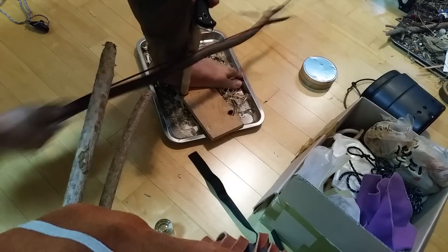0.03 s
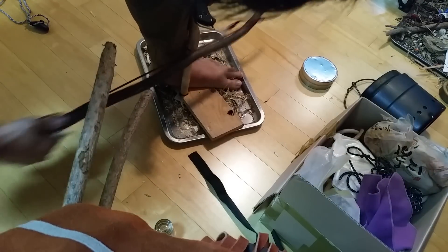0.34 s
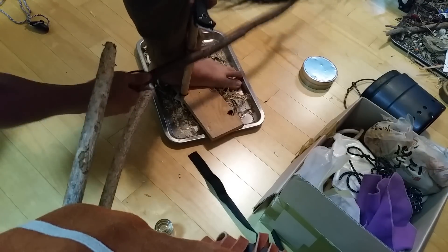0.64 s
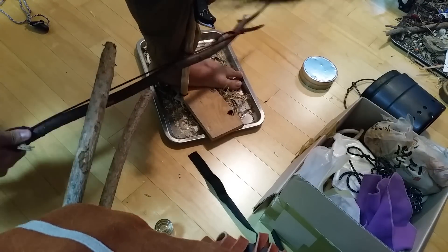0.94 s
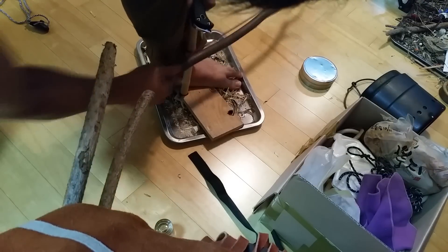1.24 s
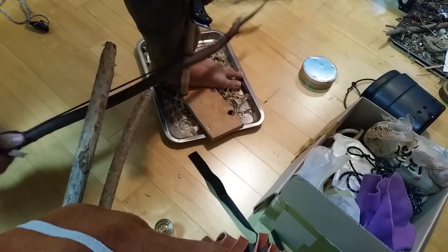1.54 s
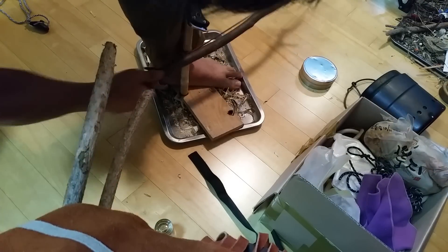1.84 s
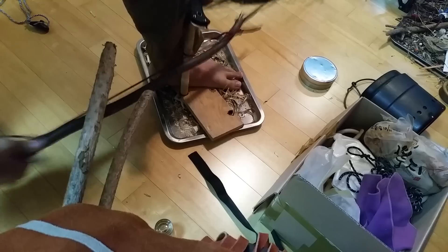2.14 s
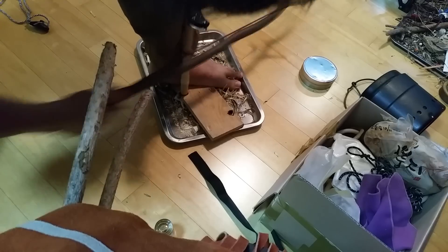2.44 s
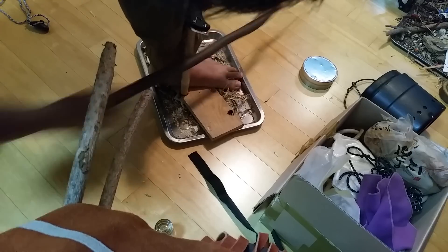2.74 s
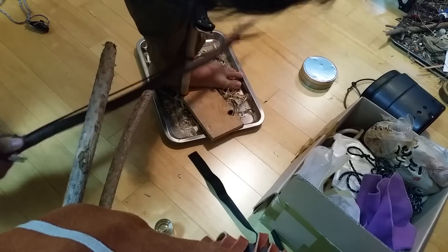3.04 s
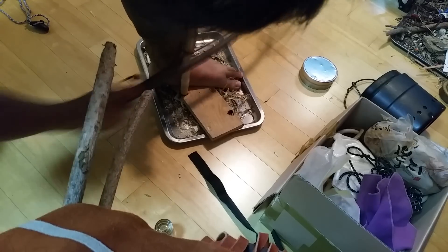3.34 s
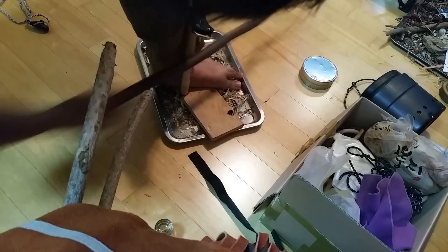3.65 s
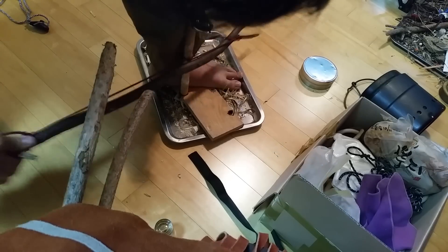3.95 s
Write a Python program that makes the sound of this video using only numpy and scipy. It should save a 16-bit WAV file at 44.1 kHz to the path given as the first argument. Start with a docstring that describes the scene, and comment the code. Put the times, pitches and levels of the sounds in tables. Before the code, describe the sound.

A wooden bow drill rubs back and forth throughout four seconds, making dry, hissing strokes, nearly four a second, growing slightly louder. The board knocks on a metal tray at about 1 second, sharply at 1.6, then often, with a bright snap at 3.6. Faint squeaks come near 1.8 and 2.9 seconds. Soft juddering groans and a low floor rumble build underneath, in a small quiet room.

```python
"""A bow drill, worked on a board in a metal tray on a wooden floor; two microphones in a small room.
Each push and pull of the bow spins the spindle, whose tip hisses in its dry socket, rings the board
and at times squeaks or judders with a low groan. The board rocks and knocks on the tray, the wood
ticks, and tray and floor rumble under the effort. Behind it all: a short room tail and still air."""
import sys
import numpy as np
from scipy import signal
from scipy.fft import rfft, irfft, next_fast_len
from scipy.io import wavfile
from scipy.ndimage import uniform_filter1d, map_coordinates

SR = 44100
rng = np.random.default_rng(int(sys.argv[2]) if len(sys.argv) > 2 else 0)


def dump(signal):
    """Clip the signal to [-1, 1] and save it as 16-bit WAV at the path in sys.argv[1]."""
    limited = np.clip(np.atleast_2d(signal).T, -1, 1)
    pcm = np.round(limited * 32767).astype(np.int16)
    wavfile.write(sys.argv[1], SR, pcm)


N = 176400

# still air of the room: freq_hz, gain_db
AIR_COLOUR = [(25, -16), (70, -6.5), (200, -7), (400, -9.5), (1500, -37), (15000, -19)]
# decay of the room: freq_hz, t60_s
ROOM_DECAY = [(200, 0.37), (1500, 0.32), (10000, 0.21)]
# the floor under the tray: freq_hz, width_hz, gain_db
FLOOR_MODES = [(143, 19.3, 1), (187.7, 12.8, 2.5), (222, 11, -1.5), (267, 13, -1.5)]
# dull thudding of tray and floor: freq_hz, gain_db
THUD_COLOUR = [(25, -34), (60, -6), (110, 7.5), (260, -0.5), (340, -5.5), (550, -6.5), (800, -15.5),
               (2000, -18.5)]
# rise and fall of the rumble: time_s, level_db
RUMBLE_LEVELS = [(0.0, -68), (0.14, -46.5), (0.46, -58), (0.59, -50.5), (0.73, -62), (0.97, -43.5),
                 (1.18, -56), (1.25, -42), (1.39, -55), (1.63, -36.5), (1.77, -53), (1.84, -44),
                 (1.97, -46), (2.18, -41), (2.27, -53.5), (2.37, -41), (2.54, -51), (2.7, -37),
                 (2.83, -49.5), (2.88, -41.5), (2.96, -49.5), (3.19, -38), (3.45, -45.5), (3.66, -32.5),
                 (3.98, -46.5), (4.0, -32.5)]
# rise and fall of the floor's lowest mode: time_s, level_db
BOOM_LEVELS = [(0.0, -67), (0.18, -62), (0.68, -67.5), (1.6, -53), (2.62, -61), (2.7, -47), (2.9, -62.5),
               (3.23, -48), (3.49, -65), (3.53, -51.5), (3.95, -47), (4.0, -54.5)]
# dry ticks of the wood: start_s, peak_db
WOOD_TICKS = [(1.9202, -24.5), (3.610, -17.5), (3.651, -29)]
# spectrum of a tick: freq_hz, gain_db
TICK_COLOUR = [(500, -16), (3000, -19), (10000, 10), (16000, -5)]
# resonances of board and tray: freq_hz, width_hz, gain_db
BOARD_MODES = [(940, 104, 1.5), (1062, 111, -2), (1402, 64, 5.5), (1730, 160, -0.5), (1846, 75, -1.5)]
# the board knocks on the tray: start_s, low_modes_db, middle_mode_db, high_modes_db, crack_db
BOARD_KNOCKS = [(.264, -45, -55, -58, -42), (1.048, -28, -24.5, -18.5, -26), (1.505, -34, -32, -46, -49),
                (1.585, -14, -22.5, -20.5, -28), (1.607, -32, -40, -37, -44), (1.659, -39, -36, -45, -34.5),
                (1.792, -35, -37, -44, -44), (1.925, -42, -49, -52, -36.5), (2.002, -39.5, -46, -50, -37),
                (2.162, -31, -32, -45, -30.5), (2.187, -28.5, -33, -44, -53),
                (2.493, -28.5, -31.5, -36, -52), (2.715, -38, -53, -55, -43), (3.026, -36, -28.5, -38, -39),
                (3.102, -29.5, -26, -31, -28.5), (3.164, -25.5, -25, -39, -34),
                (3.506, -32.5, -42, -44, -36), (3.574, -36, -28, -35, -39),
                (3.612, -20.5, -21.5, -19.5, -21), (3.654, -23.5, -35, -40, -30.5),
                (3.703, -30, -25.5, -40, -40), (3.908, -31.5, -34, -42, -36)]
# the crack of a knock: freq_hz, gain_db
CRACK_COLOUR = [(30, -35), (100, -2), (400, 12), (550, 9), (750, 4), (1800, 6), (2100, -19), (2600, 11),
                (4000, -28), (12000, -23), (16000, -27)]
# low groans of the spindle juddering in its socket: middle_s, length_s, pitch_hz, level_db
SPINDLE_JUDDERS = [(.14, 0.21, 222, -71), (.95, 0.31, 218, -47.5), (1.245, 0.11, 262.5, -41),
                   (1.85, 0.14, 267, -41.5), (2.15, 0.16, 152, -40), (2.365, 0.15, 267, -42),
                   (2.385, .12, 147, -40), (2.69, 0.045, 218, -38.5), (3.09, 0.21, 232.7, -40),
                   (3.2, 0.12, 163.2, -34.5), (3.66, 0.11, 180, -39), (3.78, 0.18, 150.9, -42),
                   (3.94, .1, 263.5, -44.5)]
# thin squeaks of the tip: middle_s, length_s, pitch_hz, level_db
TIP_SQUEAKS = [(1.82, .14, 1420, -47), (2.88, .13, 1425, -45), (1.834, .02, 7950, -38)]
# bow strokes, push and pull in turn: start_s, fastest_s, end_s, level_db
BOW_STROKES = [(-0.057, 0.195, 0.26, -35.5), (0.33, 0.542, 0.74, -37), (0.709, 0.993, 1.09, -34.5),
               (1.122, 1.26, 1.415, -33), (1.376, 1.613, 1.686, -31), (1.692, 1.812, 1.958, -33),
               (1.92, 2.126, 2.217, -32), (2.228, 2.351, 2.474, -33), (2.415, 2.649, 2.738, -35),
               (2.715, 2.867, 2.985, -35), (2.947, 3.121, 3.209, -31), (3.181, 3.32, 3.414, -33),
               (3.409, 3.554, 3.646, -31), (3.619, 3.753, 3.84, -30.5), (3.825, 3.977, 4.17, -32.0)]
# colour of the pull against the push: freq_hz, gain_db
PULL_OVER_PUSH = [(1700, 4.5), (2800, 2.5), (4500, -0.5), (7100, 2.5), (7900, 1.5), (8800, 4.5),
                  (10500, 1.5), (12300, 1.5), (15000, 2.5)]
# friction hiss at the left microphone: freq_hz, gain_db
LEFT_MIC_HISS = [(150, -24), (400, -15.5), (800, -10.5), (2000, -7.5), (2900, -7), (3600, -9), (4200, -9.5),
                 (5200, -15), (5800, -15), (7100, -17), (7700, -9), (8400, -10), (10300, 2), (11200, -3),
                 (12300, -1.5), (14000, -10.5), (15600, -9.5)]
# friction hiss at the right microphone: freq_hz, gain_db
RIGHT_MIC_HISS = [(150, -7), (400, -18), (800, -13.5), (2000, -5.5), (2850, -1), (3800, -5.5), (4250, 0.5),
                  (5200, -4.5), (5800, 0.5), (7200, -5.5), (7850, 2), (8400, -2), (9500, -7), (12500, -9),
                  (15600, -9.5)]


def amp(db):
    return 10 ** (np.asarray(db) / 20)


def unit(x):
    return x / np.sqrt(np.mean(x ** 2) + 1e-20)


def along(points, hz):
    """Read (freq_hz, value) points on a log frequency axis."""
    freqs, values = np.transpose(points)
    return np.interp(np.log(hz + 1), np.log(freqs + 1), values)


def wobble(knots_per_s):
    """A smooth random curve."""
    return map_coordinates(rng.standard_normal(N // 4), [np.arange(N) * knots_per_s / SR], mode="wrap")


def filtered(x, response):
    """x through a complex response of frequency."""
    size = x.shape[-1]
    padded = next_fast_len(size + SR // 4)
    return irfft(rfft(x, padded) * response(np.fft.rfftfreq(padded, 1 / SR)), padded)[..., :size]


def coloured(x, points):
    """x through a (freq_hz, gain_db) curve."""
    return filtered(x, lambda hz: amp(along(points, hz)))


def resonate(x, modes):
    """x through resonances of alternating polarity."""
    return filtered(x, lambda hz: sum(
        (-1) ** k * amp(db) * 1j * hz * width / (centre ** 2 - hz ** 2 + 1j * hz * width)
        for k, (centre, width, db) in enumerate(modes)))


def burst(t60_s, size):
    """Noise that dies away."""
    return rng.standard_normal(size) * np.exp(-np.log(1000) * np.arange(size) / SR / t60_s)


def add(track, start_s, sound):
    part = track[..., round(start_s * SR):][..., :sound.shape[-1]]
    part += sound[..., :part.shape[-1]]


def room_air(level_db=-61, spread=0.13):
    """Still air, nearly the same at both microphones."""
    noise = rng.standard_normal(N) + spread * rng.standard_normal((2, N))
    return amp(level_db) * unit(coloured(noise, AIR_COLOUR))


def room_tail(x, tail_count=13, delay_s=0.005):
    """A short diffuse tail, different at each microphone, its fine grain changing at random over time."""
    out, tail_index = np.zeros((2, N)), np.linspace(0, tail_count - 1, N)
    for k in range(tail_count):
        hz, t, spectrum = signal.stft(rng.standard_normal((2, SR // 3)), SR, nperseg=256)
        decay = np.exp(-np.log(1000) * t / along(ROOM_DECAY, hz)[:, None])
        tail = signal.istft(spectrum * decay, SR, nperseg=256)[1]
        tail /= np.linalg.norm(tail[0])
        span = np.flatnonzero(np.abs(tail_index - k) < 1)
        crossfaded = x[span] * np.cos(np.pi / 2 * (tail_index[span] - k))
        add(out, span[0] / SR + delay_s, signal.fftconvolve(crossfaded[None], tail, axes=1))
    return out


def close_reflections(x, count=10, span_s=0.012, level_db=-11.5):
    """The direct sound and weak copies off tray and floor."""
    taps = np.zeros(SR // 10)
    gains = amp(level_db) * rng.choice([-1, 1], count) / np.sqrt(count)
    taps[(rng.uniform(0.1, 1, count) * span_s * SR).astype(int)] = gains
    taps[0] = 1
    return signal.fftconvolve(x, taps)[:N]


def shaken(modes):
    """Modes kept ringing at an even level by random jolts."""
    ring = unit(resonate(rng.standard_normal(N), modes))
    local_power = np.abs(uniform_filter1d(ring ** 2, size=3000))
    return unit(ring / np.sqrt(local_power + 0.16))


def floor_rumble(modes_db=-2.5, thud_db=-6.5, boom_db=2.5, boom_hz=69.8, boom_width_hz=5.1):
    """The chattering drill shakes tray and floor; the floor's lowest mode booms."""
    t = np.arange(N) / SR
    level, boom_level = [amp(np.interp(t, *np.transpose(rows))) for rows in (RUMBLE_LEVELS, BOOM_LEVELS)]
    thud = amp(thud_db) * unit(coloured(rng.standard_normal(N), THUD_COLOUR))
    ring = amp(modes_db) * shaken(FLOOR_MODES)
    boom = amp(boom_db) * shaken([(boom_hz, boom_width_hz, 0)])
    return level * (ring + thud) + boom_level * boom


def wood_ticks(t60_s=0.035):
    """The wood gives tiny bright snaps, different at each microphone."""
    out = np.zeros((2, N))
    for start_s, peak_db in WOOD_TICKS:
        snap = coloured(np.array([burst(t60_s, size=2000) for _ in out]), TICK_COLOUR)
        add(out, start_s, amp(peak_db) * snap / np.abs(snap).max())
    return out


def board_knocks(contact_db=-2, rattle_db=-14.5, split_hz=(1200, 1550), low_cut_hz=90):
    """The board strikes the tray: a rough contact and rattle ring three groups of modes, with a crack."""
    out, size = np.zeros(N), SR // 3
    groups = [[mode for mode in BOARD_MODES if np.searchsorted(split_hz, mode[0]) == k] for k in range(3)]
    for start_s, *levels_db in BOARD_KNOCKS:
        contact = amp(contact_db) * unit(burst(t60_s=0.016, size=size))
        rattle = amp(rattle_db) * unit(burst(t60_s=0.21, size=size))
        force = (contact + rattle) / np.sqrt(size)
        force[0] += 1  # the blow itself
        rings = [resonate(force, group) for group in groups]
        crack = coloured(burst(t60_s=0.07, size=size), CRACK_COLOUR)
        for part, db in zip(rings + [crack], levels_db):
            add(out, start_s, amp(db) * part / np.abs(part).max())
    # the small board radiates little bass
    return filtered(out, lambda hz: (1j * hz / (1j * hz + low_cut_hz)) ** 2)


def board_ring(strength, gain_db=-17.5, grain_db=4, flutter_db=3):
    """Coarse slips of the tip keep the board ringing."""
    slips = rng.standard_normal(N) * amp(grain_db * wobble(400) + flutter_db * wobble(29.81))
    return amp(gain_db) * strength * unit(resonate(slips, BOARD_MODES))


def stick_slip(tones, waver_share, wavers_per_s):
    """The tip sticks and slips in its socket: short wavering tones that swell and fade."""
    t, out = np.arange(N) / SR, np.zeros(N)
    for middle_s, length_s, pitch_hz, level_db in tones:
        swell = np.cos(np.pi * np.clip((t - middle_s) / length_s, -0.5, 0.5)) ** 2
        hz = pitch_hz * (1 + waver_share * wobble(wavers_per_s))
        out += amp(level_db) * np.sqrt(2) * swell * np.sin(2 * np.pi * np.cumsum(hz) / SR)
    return out


def bowing(speed_exponent=1.327, linger_s=0.031, linger_share=0.39, rest_db=-57):
    """The bow's swings set the strength of the rubbing, the pull's share in it and the spindle's speed."""
    t = np.arange(N) / SR
    power, speed = np.zeros((2, N)), np.zeros(N)  # power rows: push, pull
    for k, (start_s, fastest_s, end_s, level_db) in enumerate(BOW_STROKES):
        swing = np.abs(np.sin(np.pi * np.interp(t, [start_s, fastest_s, end_s], [0, 0.5, 1])))
        power[k % 2] += (amp(level_db) * swing ** speed_exponent) ** 2
        speed = np.maximum(speed, swing)
    pole = np.exp(-1 / (linger_s * SR))
    lingering = signal.lfilter([1 - pole], [1, -pole], power)  # fade as the bow reverses
    power = power + linger_share * lingering + amp(rest_db) ** 2 / 2
    total = power.sum(0)
    return np.sqrt(total), power[1] / total, speed


def tip_wander(x, depth_db=1.47):
    """The colour shifts as the tip wanders: patches a few hundred Hz wide and about 60 ms long."""
    spectrum = signal.stft(x, nperseg=512)[2]
    patches = uniform_filter1d(rng.standard_normal(spectrum.shape[1:]), size=4, axis=0)
    patches = uniform_filter1d(patches, size=11, axis=1)
    return signal.istft(spectrum * amp(depth_db * unit(patches)), nperseg=512)[1][..., :N]


def rubbing_sheen(hiss, strength, corner_hz=9500, exponent=0.041):
    """Hard rubbing is brighter, the slow turns duller."""
    treble = filtered(hiss, lambda hz: 1 / (1 + (corner_hz / (hz + 1)) ** 4))
    return hiss + treble * ((strength / strength.mean()) ** exponent - 1)


def spindle_hiss(strength, pull_share, speed, turns_per_s=24, turn_db=0.2, flutter_db=0.95, grain_db=0.5):
    """Fine grains of friction in the dry socket, swelling once a turn; push and pull differ in colour."""
    turns = np.cumsum(turns_per_s * speed * (1 + 0.205 * wobble(14))) / SR
    uneven_db = turn_db * np.sin(2 * np.pi * turns) + flutter_db * wobble(70) + grain_db * wobble(2500)
    grains = tip_wander(unit(amp(uneven_db)) * rng.standard_normal((2, N)))
    pull = filtered(grains, lambda hz: amp(along(PULL_OVER_PUSH, hz) / 2))
    push = filtered(grains, lambda hz: amp(-along(PULL_OVER_PUSH, hz) / 2))
    pull_gain, push_gain = np.sqrt(pull_share), np.sqrt(1 - pull_share)
    rub = (pull_gain * pull + push_gain * push) / (pull_gain + push_gain)
    left = amp(0.5) * unit(coloured(close_reflections(rub[0]), LEFT_MIC_HISS))
    right = amp(2.16) * unit(coloured(close_reflections(rub[1]), RIGHT_MIC_HISS))
    return rubbing_sheen(strength * np.array([left, right]), strength)


def scene(pan_db=-1.2, lead_s=0.00008, wood_send_db=-4, low_send_db=-20.5):
    """The drill as it reaches the two microphones; board, squeaks, rumble and groans excite the room."""
    strength, pull_share, speed = bowing()
    hiss = spindle_hiss(strength, pull_share, speed)
    wood = board_ring(strength) + board_knocks()
    wood += stick_slip(TIP_SQUEAKS, waver_share=0.0136, wavers_per_s=190)
    low = floor_rumble() + stick_slip(SPINDLE_JUDDERS, waver_share=0.0872, wavers_per_s=70)
    # the board is a little louder at the right microphone and a little earlier at the left
    sides = np.array([[1], [-1]])
    direct = filtered(wood, lambda hz: amp(sides * pan_db) * np.exp(1j * np.pi * hz * lead_s * sides))
    air = room_air()
    into_room = amp(wood_send_db) * wood + amp(low_send_db) * low
    return hiss + wood_ticks() + direct + low + room_tail(into_room) + air


def record(dry, band_limit_hz=15750):
    """The recorder keeps nothing above its band limit."""
    return filtered(dry, lambda hz: hz < band_limit_hz)


dry = scene()
out = record(dry)
dump(out)
```